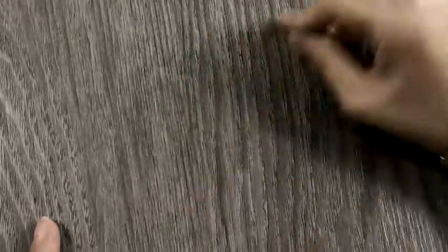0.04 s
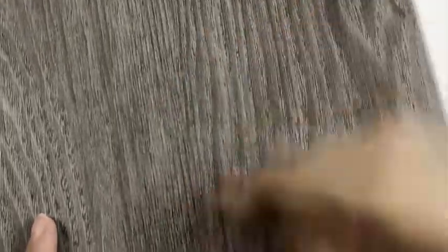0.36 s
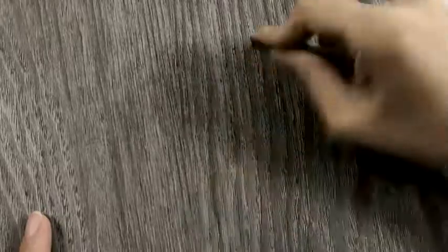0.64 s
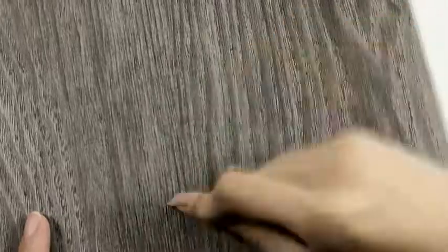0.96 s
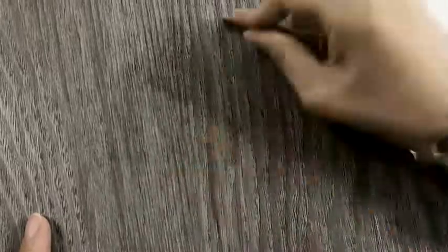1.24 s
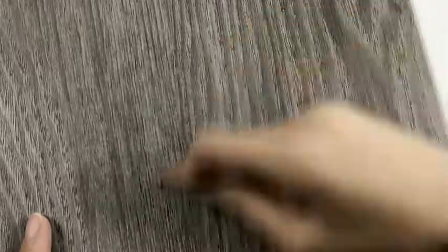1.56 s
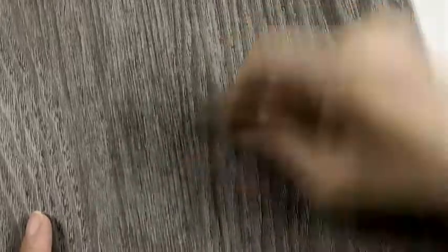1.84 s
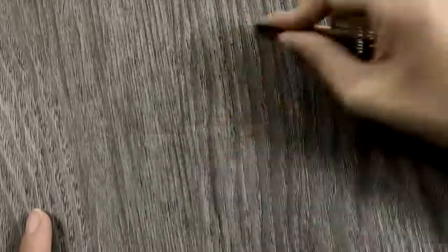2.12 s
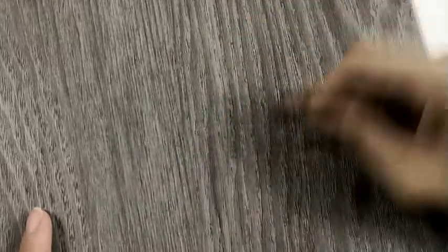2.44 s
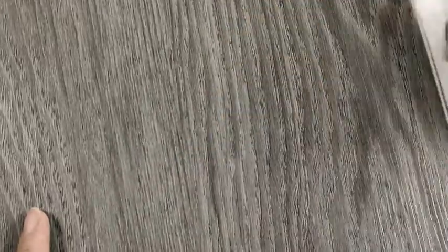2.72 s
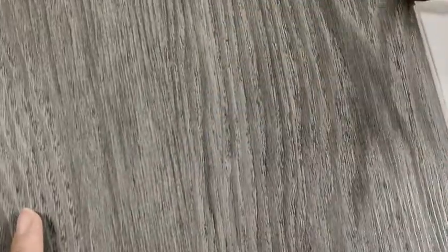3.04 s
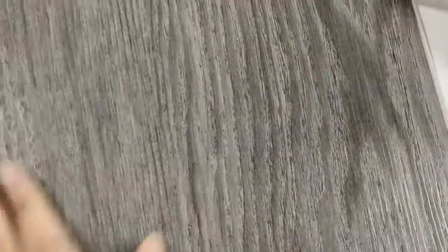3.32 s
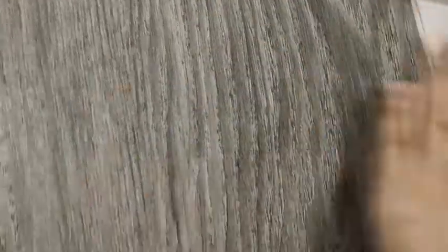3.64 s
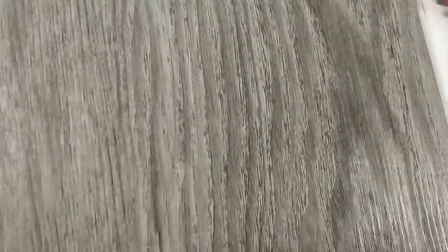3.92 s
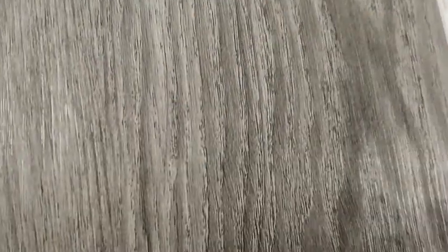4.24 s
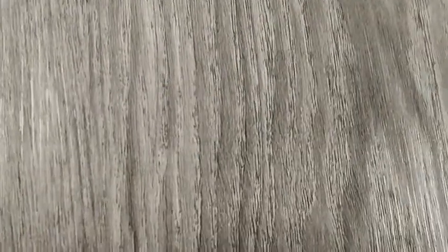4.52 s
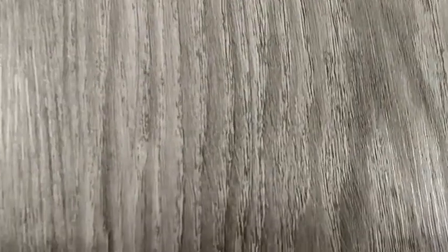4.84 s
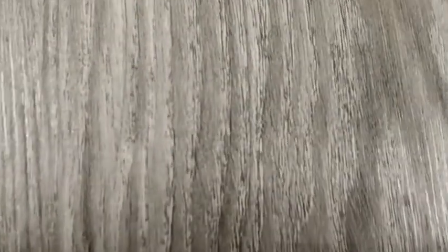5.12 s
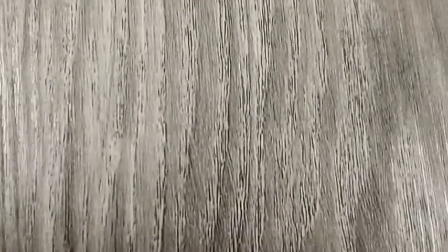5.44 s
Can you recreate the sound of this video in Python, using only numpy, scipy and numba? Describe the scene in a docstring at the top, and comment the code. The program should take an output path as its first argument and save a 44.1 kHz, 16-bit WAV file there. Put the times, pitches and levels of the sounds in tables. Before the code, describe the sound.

Close up in a small room, rapid, even scraping runs to and fro on a floorboard, about nine strokes a second. The hard little tip rasps and clicks over the ridges, with brief squeaky chatters and the faintest jingle of a bracelet. Just past halfway it ends, the hand brushes softly away, and only room hiss and a low rumble with slight microphone bumps remain.

```python
"""Quick, dry scratching, to and fro: a small hard tip, pinched in the fingers, scrubs across the grain
of a floor plank close by. It catches and slips on ridge after ridge and rings the board, whose edge
echoes shift as the tip travels; a bracelet jingles faintly. After three seconds the hand leaves with
a few soft brushes, and the hiss and low rumble of a small room remain."""
import sys
import numpy as np
from scipy import signal
from scipy.fft import rfft, irfft
from scipy.io import wavfile
from numba import njit

SR = 44100
rng = np.random.default_rng(int(sys.argv[2]) if len(sys.argv) > 2 else 0)


def wrap_up_sound(samples):
    """Save the sound to the file named by the first command line argument, as 16-bit audio."""
    columns = np.atleast_2d(samples).T
    # keep every value between -1 and 1, then stretch to whole-number steps
    tamed = np.clip(columns, -1, 1)
    steps = np.round(tamed * 32767).astype(np.int16)
    wavfile.write(sys.argv[1], SR, steps)


N = 245637
TIME = np.arange(N) / SR

# Pulls and pushes in turn. Each row: break-loose time and slide length in seconds, level and tilt in dB.
HAND_STROKES = [(-0.055, 0.096, -33, 3), (.035, 0.095, -25, -4), (0.144, 0.095, -30, 4.5),
                (0.252, 0.086, -25, 2), (0.363, 0.1, -28, 3), (.475, .074, -26, 2),
                (0.573, 0.086, -29.5, -2), (.679, 0.086, -25, 0.5), (0.782, .097, -27.5, 1),
                (0.887, 0.087, -25.5, -0.5), (0.991, 0.09, -31.5, -1.5), (1.097, 0.084, -28.5, -5),
                (1.202, 0.09, -28.5, -5), (1.305, .085, -26, -4), (1.412, 0.092, -28, -3),
                (1.518, 0.092, -24, -7), (1.623, 0.091, -28.5, -3), (1.725, 0.088, -24, -6),
                (1.831, 0.086, -26.5, 0), (1.931, 0.095, -25.5, -5), (2.034, 0.091, -32, 3),
                (2.144, .078, -28.5, -13), (2.241, 0.11, -29, -3), (2.358, 0.084, -25.5, -9.5),
                (2.464, 0.093, -31, 1), (2.574, 0.08, -25, -3), (2.674, 0.079, -31.5, 1.5),
                (2.777, 0.056, -29, -5.5), (2.851, 0.13, -33.5, -1.5)]
# Friction spectra. Each row: frequency in Hz, relative level in dB on a push and on a pull.
SCRAPE_SPECTRA = [(250, -33, -42), (534, -39, -39.5), (776, -28.5, -22.5), (1162, -4.5, -8.5),
                  (1470, -4, -9.5), (2310, -6, -5), (2664, 0, -2.5), (3018, -11, -10.5), (3600, -21, -28),
                  (4150, -25.5, -17), (4374, -25, -23.5), (5400, -45.5, -39), (7070, -44.5, -40),
                  (7340, -52, -55.5), (15000, -65.5, -64)]
# Jolts from deep ridges. Each row: time in seconds, level in dB.
HARD_SNAGS = [(0.3002, -7), (0.709, -7), (0.933, -3), (1.0053, -11), (1.352, -2), (1.7527, -9.5),
              (2.1859, 0), (2.419, -2.5)]
# Resonances of the tip. Each row: frequency in Hz, bandwidth in Hz, relative gain in dB.
TIP_MODES = [(1437, 190, -4), (2457, 240, -9), (3916, 110, -1.5)]
# Plank resonances. Each row: frequency and bandwidth in Hz, gain in dB, antinode along the stroke (0-1).
PLANK_MODES = [(1170, 15, -1.5, 0.7), (1437, 14, -3.5, 0.7), (1558, 44, 4, 0.2), (1662, 73, 0, 0.28),
               (1850, 63, 6, 1), (1986, 30, 9.5, 0.35), (2360, 32, 7, 0.76), (2578, 190, 1, 0.63),
               (3170, 400, 4, 0.69), (3790, 120, 9.5, 0.4)]
# Moments when the tip chatters. Each row: time in seconds, pitch in Hz, level in dB.
TIP_CHATTERS = [(0.196, 1975, -35), (0.295, 2515, -31.5), (0.407, 2730, -36.5), (0.513, 2610, -34),
                (0.723, 2570, -36.5), (2.381, 1520, -39), (2.617, 2535, -32.5), (2.903, 1773, -34)]
# Jingles of the bracelet. Each row: time in seconds, level in dB.
BRACELET_JINGLES = [(1.538, -56.5), (1.881, -45.5), (2.298, -54.5), (2.906, -49)]
# The hand rubbing the board. Each row: time in seconds, levels of the low and hollow tones in dB.
HAND_RUB = [(0, -63.5, -68.5), (1.299, -64.5, -63), (1.7, -58, -59), (2.399, -68, -52), (2.8, -78, -59.5),
            (3, -85, -65.5)]
# Passing brushes. Each row: time and half length in seconds, skin and sleeve levels in dB,
# pitch in Hz, level of that pitch in dB.
HAND_BRUSHES = [(0.794, 0.025, -61, -51.5, 1180, -68), (3.167, 0.027, -44, -62, 440, -64),
                (3.256, 0.018, -53.5, -77, 1660, -62), (3.514, 0.032, -52, -83, 1690, -57),
                (3.63, 0.049, -60, -64.5, 1520, -64), (3.992, 0.067, -64, -64, 1610, -69),
                (4.733, 0.032, -56.5, -70, 1075, -60)]
# Spectra of skin, sleeve, room rumble and room hiss. Each row: frequency in Hz, relative level in dB.
SKIN_SPECTRUM = [(200, -6.5), (470, -2), (750, -11.5), (1200, -8.5), (1700, 2.5), (2100, -16.5), (2550, 2),
                 (3200, -6.5), (4500, -18), (8000, -55)]
SLEEVE_SPECTRUM = [(800, -54), (2500, 2), (4000, 2.5), (5700, -3.5), (6800, -19.5), (8000, -47)]
RUMBLE_SPECTRUM = [(20, -3.5), (60, -8), (110, -3), (175, 0.5), (250, -6), (330, -10.5), (420, -17.5),
                   (560, -30), (900, -34.5), (3000, -71.5)]
HISS_SPECTRUM = [(300, -26.5), (600, -9.5), (1000, -1.5), (1350, -6.5), (1800, 0.5), (2450, 2),
                 (3200, -5.5), (4300, -14.5), (5600, -22), (6600, -32.5), (7600, -51), (15000, -52)]
# Swells of rumble as the microphone is moved. Each row: time and half length in seconds, level in dB.
HANDLING_BUMPS = [(3.26, .05, -52), (3.65, 0.19, -57.5), (4.008, 0.047, -48.5), (5.078, 0.057, -50.5)]
# Course of the room hiss. Each row: time in seconds, level in dB.
HISS_LEVELS = [(0, -53.5), (4.85, -56), (5.12, -53.5), (5.57, -54.5)]
# Faint machine hum. Each row: frequency in Hz, level in dB before the swell.
HUM_PARTIALS = [(69.5, -61), (147, -69.5)]
# Slow swell of the hum. Each row: time in seconds, gain in dB.
HUM_GAIN = [(0, -7.5), (3.1, 1.5), (3.5, 4), (4.4, 1.5), (5.57, -9.5)]


def scratching(push, pull, place, bright_db):
    """Source and filter: friction drives tip and plank; the tip's lean colours push and pull apart."""
    place = place + 0.14 * walk(7.6)  # no two strokes follow quite the same track
    spectra = np.array(SCRAPE_SPECTRA)
    grit = friction(ridges_per_s=1700, scatter_db=1, fine_db=-7, patchy_db=0.4)
    force = convolve(push * grit + snags(push + pull), response(spectra[:, [0, 1]]))
    force += convolve(pull * grit, response(spectra[:, [0, 2]]))
    force = tilt(force, bright_db, corners_hz=[1100, 2100])
    force = tip(force, place, slide=0.16, wobble=0.087)
    board = plank(force, place, near_s=0.000842, far_s=0.00275, travel_s=0.000964, echo=0.39)
    return board + chatter(half_s=0.013, width_hz=150) + high_ticks(push + pull, per_s=280, level_db=-85)


def motion(stick_s=0.018, stick_db=-3, bite_s=0.009, bite_db=-18, turn_db=-27):
    """Stick and slip: the tip holds after each turn, bites as it breaks loose, rubs louder with speed."""
    start, length, db, bright_db = np.transpose(HAND_STROKES)
    stroke = np.maximum(np.searchsorted(start - stick_s, TIME) - 1, 0)
    pushing = stroke % 2 == 1
    since = TIME - start[stroke]
    progress = np.clip((since + stick_s) / (length[stroke] + stick_s), 0, 1)
    speed = np.abs(np.sin(np.pi * progress))
    slide = speed ** np.where(pushing, 1.71, 1.73)
    bite = undb(bite_db) * np.exp(-np.abs(since) / bite_s)
    rub = np.where(since < 0, undb(stick_db) * slide, slide + bite)
    rub = np.hypot(rub, undb(turn_db))  # some rubbing remains while the hand turns round
    effort = undb(db[stroke]) * rub * (TIME < start[-1] + length[-1])
    travelled = (1 - np.cos(np.pi * progress)) / 2
    place = np.where(pushing, travelled, 1 - travelled)
    return effort * pushing, effort * ~pushing, place, bright_db[stroke]


def friction(ridges_per_s, scatter_db, fine_db, patchy_db):
    """Roughness noise: uneven slips over the ridges join fine rubbing; the grain comes in patches."""
    hits = rng.random(N) < ridges_per_s / SR
    slips = unit(hits * undb(scatter_db * np.clip(rng.standard_normal(N), -2, 2)))
    rubbing = undb(fine_db) * rng.standard_normal(N)
    return unit((slips - slips.mean() + rubbing) * undb(patchy_db * walk(260)))


def snags(effort, small_per_s=10, over_friction_db=12.5):
    """Impulsive excitation: deep ridges jolt the tip at set times, lesser ones by chance."""
    jolts = (rng.random(N) < small_per_s / SR) * effort * undb(over_friction_db)
    for at, db in HARD_SNAGS:
        jolts[int(at * SR)] += undb(db)
    return jolts


def tip(force, place, slide, wobble):
    """Variable resonance: the modes of the pinched tip shift as the fingers tilt and grip."""
    out = force
    for hz, width, db in TIP_MODES:
        centre = hz * np.exp(slide * (0.5 - place) + wobble * walk(22))
        out = out + undb(db) * glide(force, centre, float(width))
    return undb(-1) * out


def plank(force, place, near_s, far_s, travel_s, echo):
    """Reflection: bending waves return from two edges, one nearing as the other recedes; modes ring on."""
    near = np.interp(TIME - near_s - travel_s * place, TIME, force)
    far = np.interp(TIME - far_s + travel_s * place, TIME, force)
    out = (force + echo * (far - near)) / np.sqrt(1 + 2 * echo ** 2)
    for hz, width, db, antinode in PLANK_MODES:
        coupling = np.cos(np.pi * (place - antinode)) ** 2  # strongest as the tip crosses the antinode
        out += undb(db) * resonate(force * coupling, hz, width)
    return out


def chatter(half_s, width_hz, spread_oct_per_s=1.6):
    """Narrow-band resonance: the slips briefly gather at one gliding pitch and the tip almost sings."""
    out = np.zeros(N)
    t = np.arange(-SR // 25, SR // 25) / SR
    for at, hz, db in TIP_CHATTERS:
        centre = hz * 2 ** (spread_oct_per_s * rng.standard_normal() * t)
        tone = rng.standard_normal(len(t))
        for _ in range(2):
            tone = glide(tone, centre, float(width_hz))
        first = int(at * SR) - len(t) // 2
        out[first:first + len(t)] += undb(db) * unit(tone * np.exp(-0.5 * (t / half_s) ** 2))
    return out


def high_ticks(effort, per_s, level_db):
    """Power law: very faint, sparse high ticks grow steeply with the loudness of each stroke."""
    ticks = (rng.random(N) < per_s / SR) * undb(5 * np.clip(rng.standard_normal(N), -2, 2))
    return undb(level_db) * unit(above(above(ticks * effort ** 1.5, 6300), 6300))


def bracelet(effort, steady_db=-75, swing_db=-68.5):
    """Impact ringing: links on the shaking wrist tick in fits, louder in mid-swing, and briefly jingle."""
    ticks = (rng.random(N) < 500 / SR) * rng.standard_normal(N)
    ringing = narrow_band(ticks, hz=5460, width_hz=320)
    shaking = undb(steady_db) * (effort > 0) + undb(swing_db) * unit(effort) / 2
    fits = undb(4.9 * walk(18))
    jingles = sum(undb(db) * swell(at, 0.0095) for at, db in BRACELET_JINGLES)
    return ringing * (shaking * fits + jingles)


def hand(effort):
    """Forced vibration: the hand's edge rubs two board tones awake; the hollow one follows the swing."""
    at, low_db, hollow_db = np.transpose(HAND_RUB)
    low = narrow_band(rng.standard_normal(N), hz=410, width_hz=170)
    hollow = narrow_band(rng.standard_normal(N), hz=770, width_hz=170)
    low *= undb(np.interp(TIME, at, low_db) + 2 * walk(16)) * (TIME < at[-1])
    hollow *= undb(np.interp(TIME, at, hollow_db)) * np.sqrt(unit(effort))
    return low + hollow


def brushes():
    """Soft sliding friction: skin passes over the floor with a faint pitch, and a sleeve hisses."""
    skin = noise(SKIN_SPECTRUM) * undb(2 * walk(120))
    sleeve = noise(SLEEVE_SPECTRUM)
    out = np.zeros(N)
    for at, half_s, skin_db, sleeve_db, hz, ring_db in HAND_BRUSHES:
        ring = narrow_band(skin, hz, width_hz=170)
        out += swell(at, half_s) * (undb(skin_db) * skin + undb(sleeve_db) * sleeve + undb(ring_db) * ring)
    return out


def room(x, t60_s, wet_db, gap_s, warmth_db):
    """Reverberation: diffuse reflections in a small room decay exponentially, stronger in the bass."""
    t = TIME[:SR // 2]
    onset = np.clip(t / gap_s - 1, 0, 1)
    tail = rng.standard_normal(len(t)) * np.exp(-np.log(1000) * t / t60_s) * onset
    warm = tilt(x, -warmth_db, corners_hz=[1100])
    return x + undb(wet_db) * convolve(warm, tail / np.linalg.norm(tail))


def background(rumble_db=-51.5):
    """Superposition: uneven rumble, handling bumps, drifting hiss and machine hum form the noise floor."""
    rumble = noise(RUMBLE_SPECTRUM) * undb(rumble_db + walk(11))
    bumps = noise(RUMBLE_SPECTRUM) * sum(undb(db) * swell(at, half) for at, half, db in HANDLING_BUMPS)
    hiss = noise(HISS_SPECTRUM) * undb(curve(HISS_LEVELS) + walk(16))
    hum = sum(undb(db) * np.sqrt(2) * np.sin(2 * np.pi * hz * TIME + 1.6 * walk(5))
              for hz, db in HUM_PARTIALS)
    return rumble + bumps + hiss + undb(curve(HUM_GAIN)) * hum


def undb(db):
    """Amplitude grows tenfold every 20 dB."""
    return 10 ** (np.asarray(db) / 20)


def unit(x):
    """Normalisation to rms 1."""
    return x / np.sqrt(np.mean(x ** 2))


def curve(rows):
    """Linear interpolation of (seconds, value) rows."""
    return np.interp(TIME, *np.transpose(rows))


def swell(at, half_s):
    """A Gaussian envelope with standard deviation half_s."""
    return np.exp(-0.5 * ((TIME - at) / half_s) ** 2)


def walk(knots_per_s):
    """Random modulation of rms 1, interpolated between knots."""
    knots = rng.standard_normal(8192)
    return unit(np.interp(TIME * knots_per_s, np.arange(len(knots)), knots))


def convolve(x, impulse_response):
    """Linear filtering by convolution."""
    return signal.fftconvolve(x, impulse_response)[:N]


def response(points, size=2048):
    """Minimum-phase impulse response of unit energy with the given (Hz, dB) spectrum."""
    hz, db = np.transpose(points)
    freq = np.maximum(np.arange(size // 2 + 1) * SR / size, 1)
    gain = undb(np.interp(np.log(freq), np.log(hz), db))
    cepstrum = irfft(np.log(gain))
    cepstrum[1:size // 2] *= 2  # folding onto positive time makes the filter causal
    cepstrum[size // 2 + 1:] = 0
    impulse = irfft(np.exp(rfft(cepstrum)))
    return impulse / np.linalg.norm(impulse)


def noise(points):
    """Spectral shaping turns white noise into coloured noise of rms near 1."""
    return convolve(rng.standard_normal(N), response(points))


def resonate(x, hz, width_hz):
    """A damped resonator, gain 1 at its centre."""
    return signal.lfilter(*signal.iirpeak(hz, hz / width_hz, fs=SR), x)


def narrow_band(x, hz, width_hz):
    """Two resonators in cascade select one band, scaled to rms 1."""
    return unit(resonate(resonate(x, hz, width_hz), hz, width_hz))


@njit
def glide(x, hz, width_hz):
    """A state-variable resonator whose centre moves, gain 1 at the centre."""
    out = np.empty(len(x))
    band_state, low_state = 0., 0.
    for i in range(len(x)):
        tuning, damping = np.tan(np.pi * hz[i] / SR), width_hz / hz[i]
        band = (band_state + tuning * (x[i] - low_state)) / (1 + tuning * (tuning + damping))
        band_state = 2 * band - band_state
        low_state += 2 * tuning * band
        out[i] = damping * band
    return out


def above(x, hz):
    """Zero-phase high-pass filtering."""
    return signal.sosfiltfilt(signal.butter(2, hz, "high", fs=SR, output="sos"), x)


def tilt(x, db, corners_hz):
    """Spectral tilt: shelves together raise the treble by db relative to the bass."""
    for hz in corners_hz:
        treble = above(x, hz)
        step = undb(db / len(corners_hz) / 2)
        x = treble * step + (x - treble) / step
    return x


def scene():
    """Sound pressures add at one microphone: close sources, their reverberation and the background."""
    push, pull, place, bright_db = motion()
    effort = push + pull
    close = scratching(push, pull, place, bright_db) + bracelet(effort) + hand(effort) + brushes()
    return (room(close, t60_s=0.27, wet_db=-11.5, gap_s=0.0041, warmth_db=6) + background())[None]


def record(dry, top_hz=15700):
    """Band limiting: a steep low-pass filter removes the highest treble."""
    return signal.sosfilt(signal.ellip(8, 0.2, 70, top_hz, fs=SR, output="sos"), dry)


dry = scene()
out = record(dry)
wrap_up_sound(out)
```